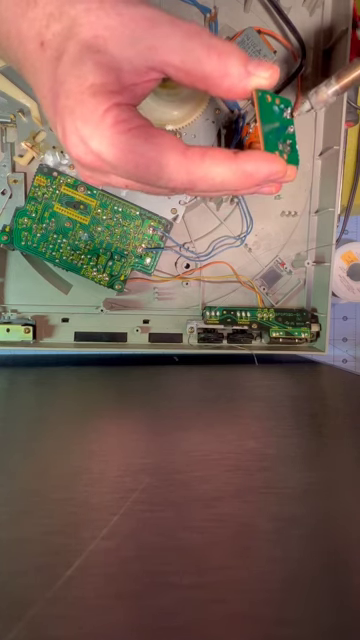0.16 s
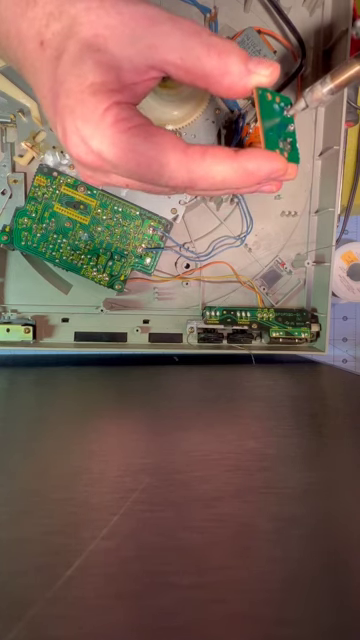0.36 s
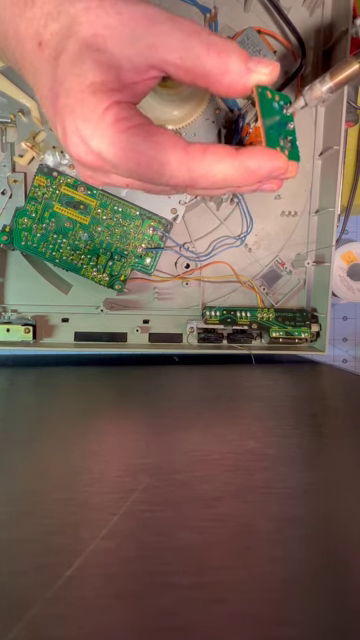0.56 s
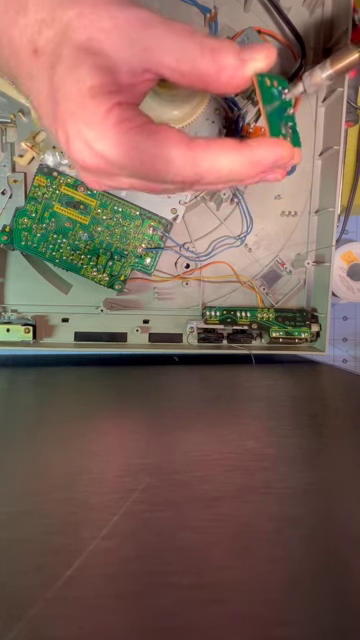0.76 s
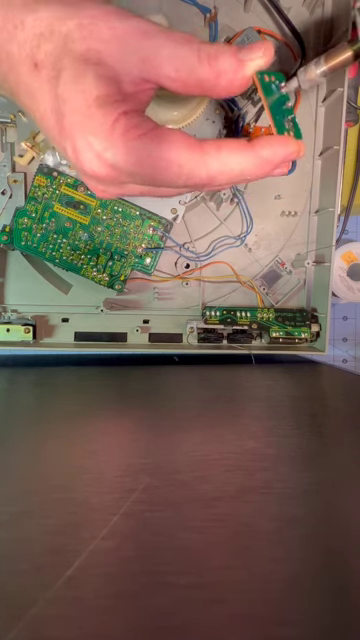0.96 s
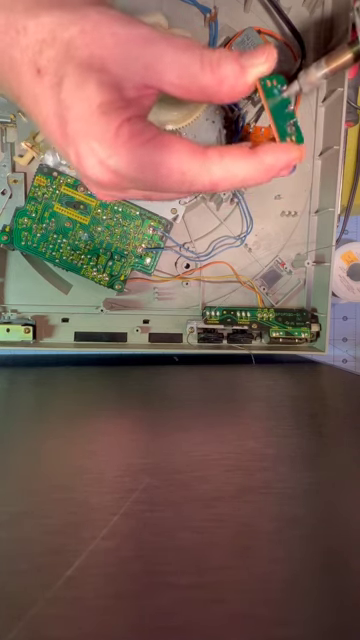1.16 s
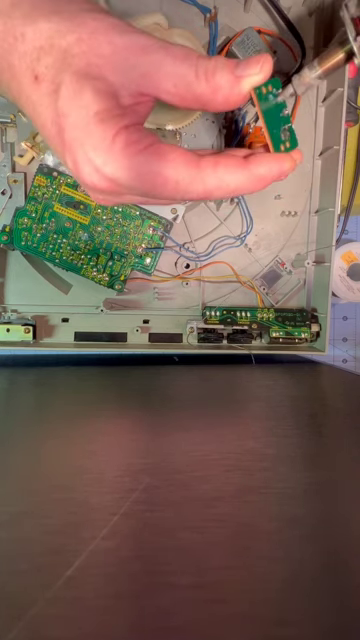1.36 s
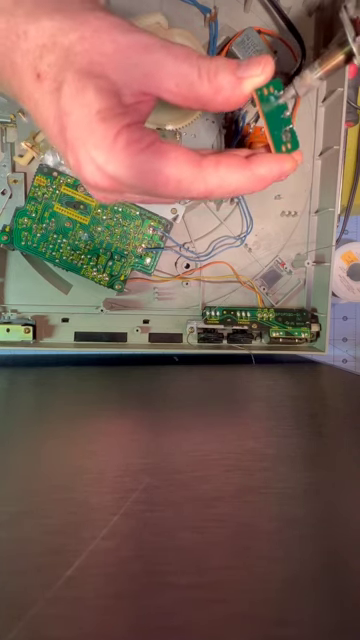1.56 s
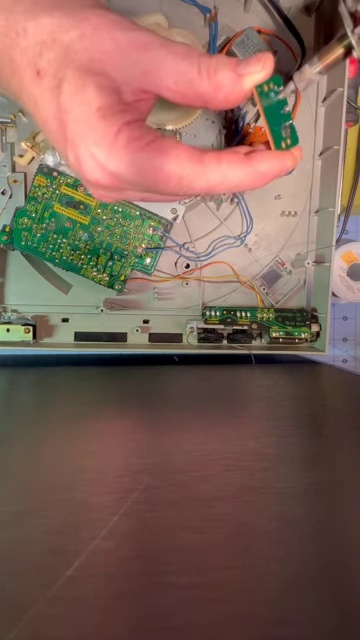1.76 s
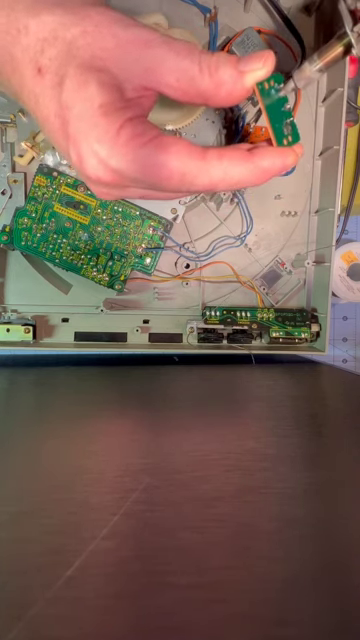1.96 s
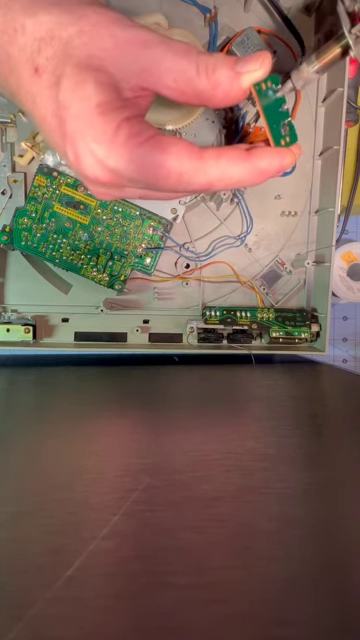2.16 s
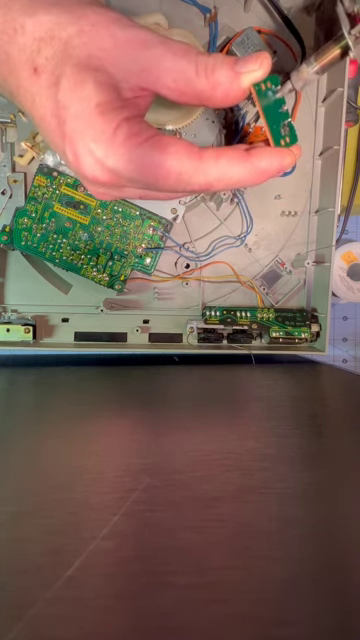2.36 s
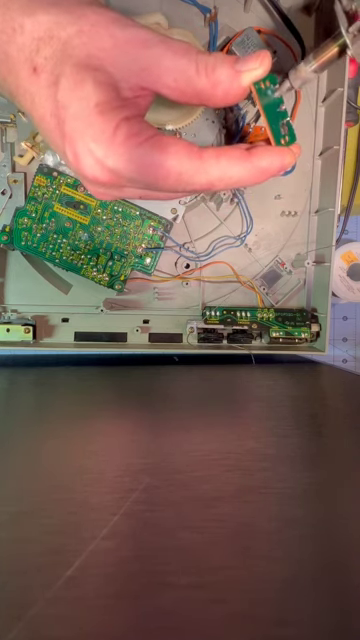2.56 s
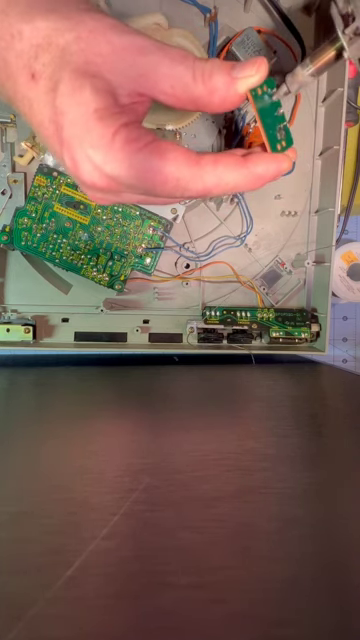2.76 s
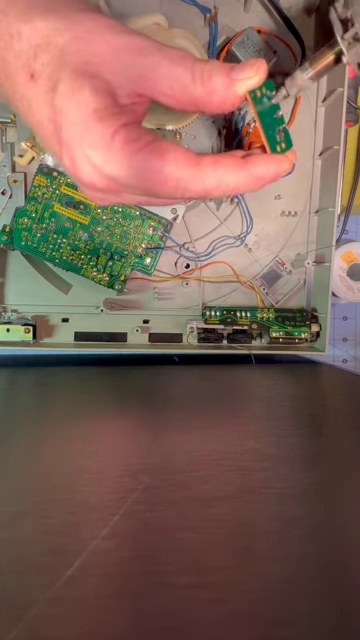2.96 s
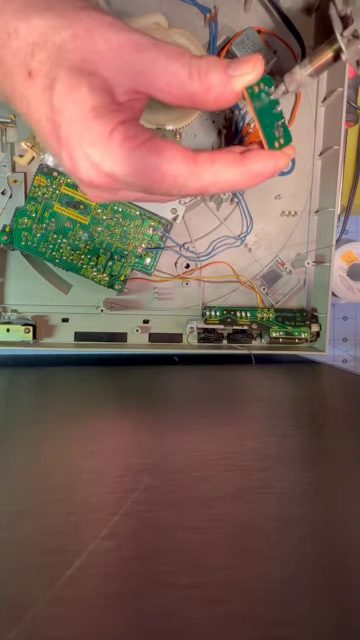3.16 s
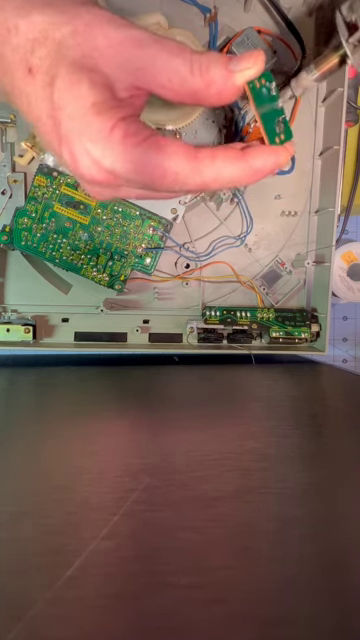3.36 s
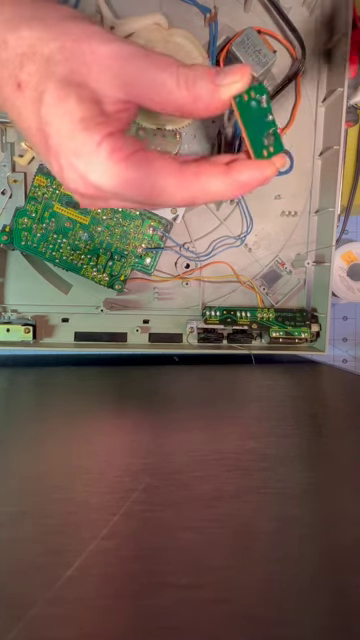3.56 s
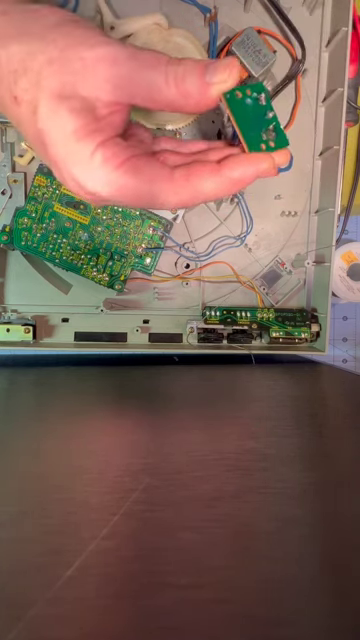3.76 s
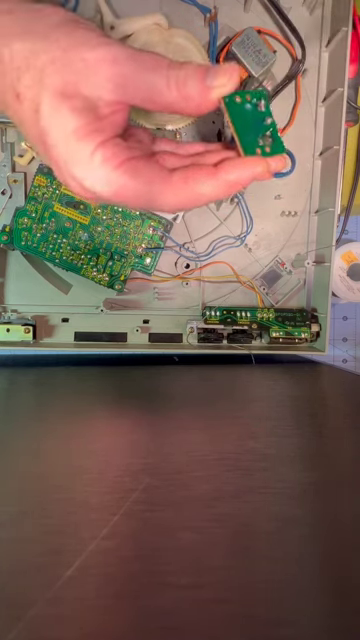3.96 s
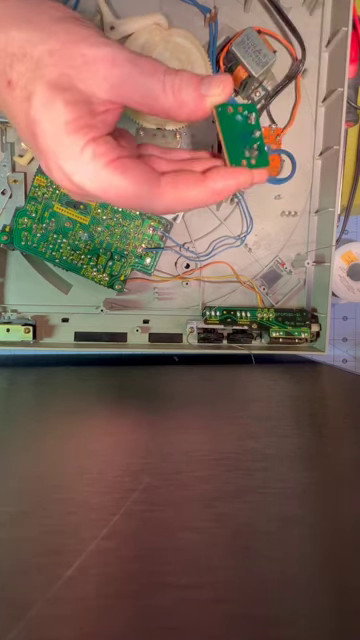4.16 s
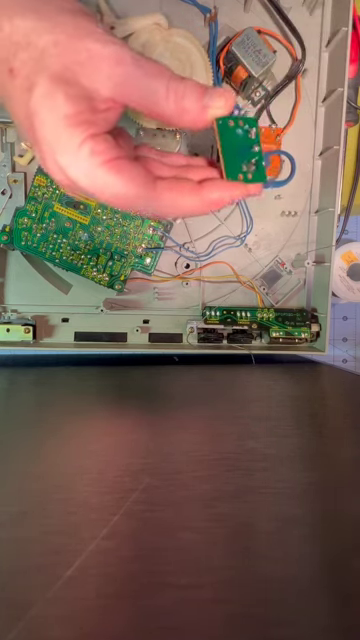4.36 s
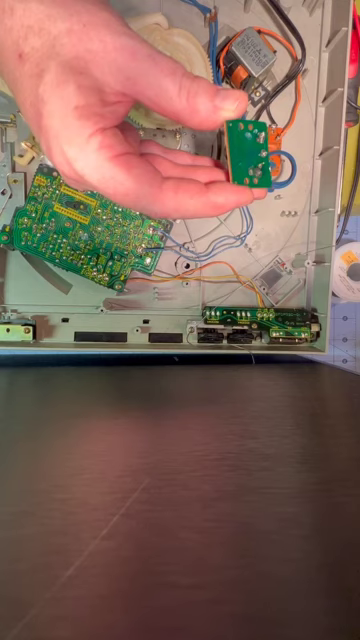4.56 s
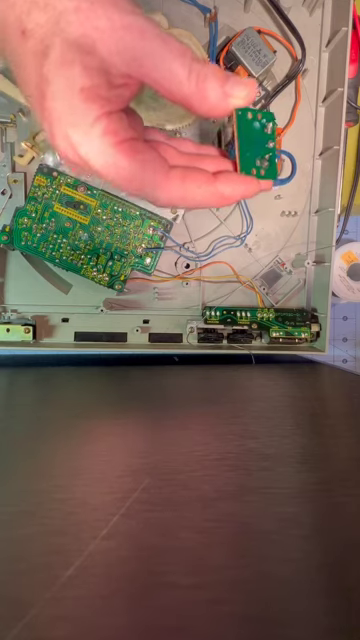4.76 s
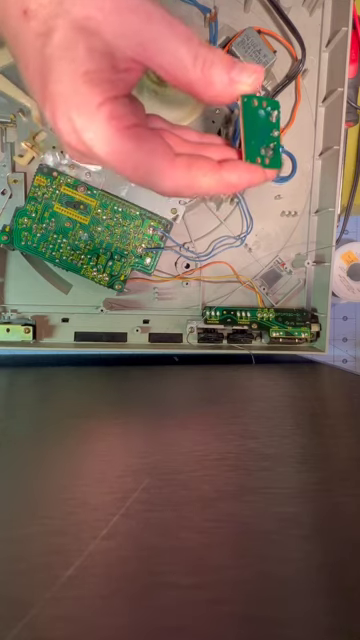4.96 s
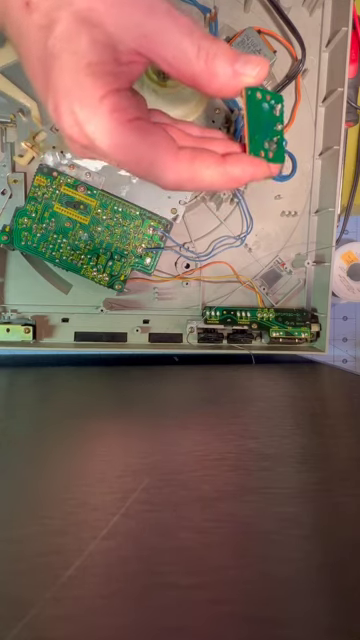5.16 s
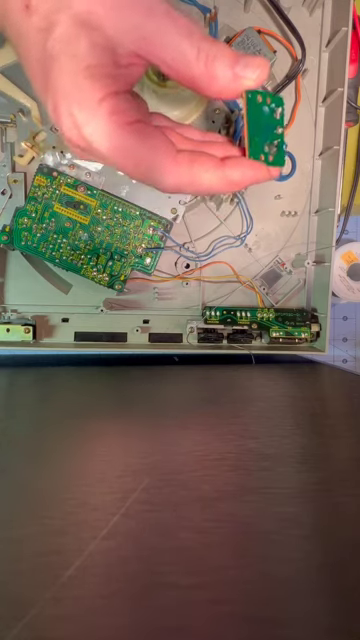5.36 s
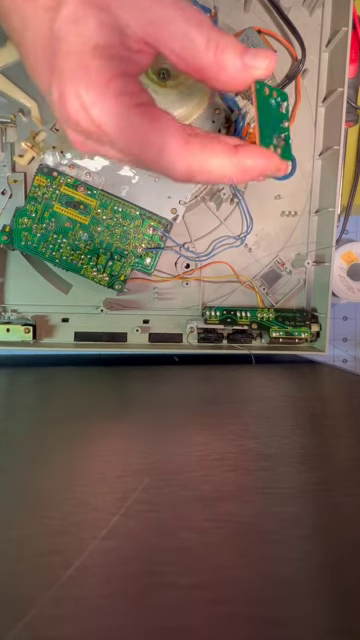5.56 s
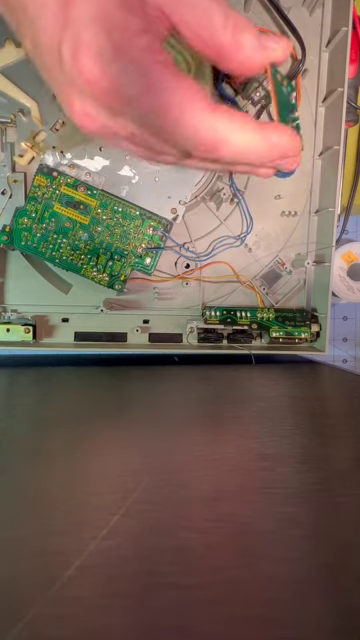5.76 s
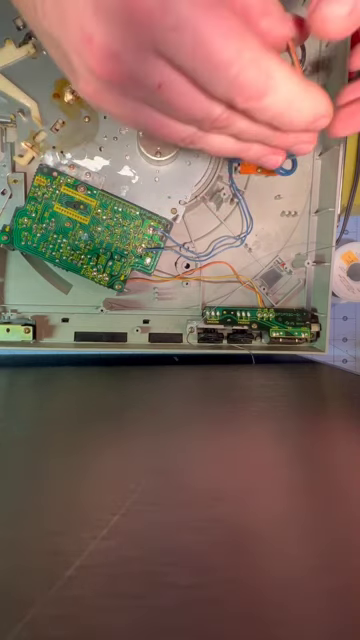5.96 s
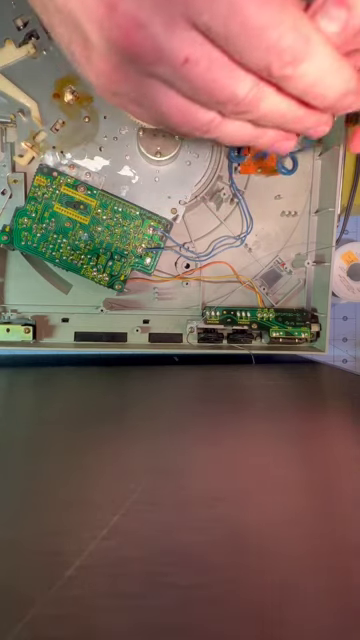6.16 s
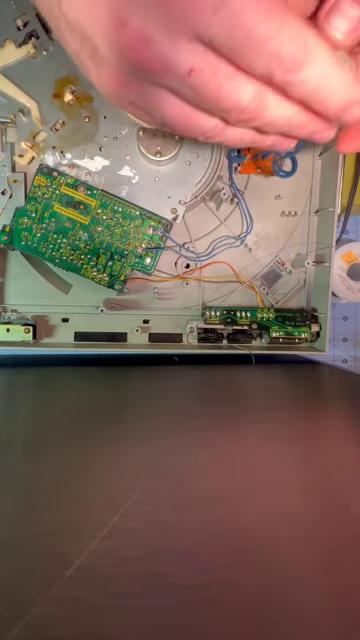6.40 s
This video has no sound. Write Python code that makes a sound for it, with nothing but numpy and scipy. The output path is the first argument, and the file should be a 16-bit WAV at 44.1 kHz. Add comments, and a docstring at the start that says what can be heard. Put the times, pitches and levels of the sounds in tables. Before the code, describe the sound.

Small dry ticks on a circuit board, then a desoldering pump buzzes for about a second, followed by metallic clatter, low thuds and a sharp scrape.

```python
"""A desoldering gun at a workbench, close to the microphone in a small room with faint air noise and hum.
Fingers rub and the hot nozzle ticks on a joint: coloured noise bursts, each with a knock of the board.
The diaphragm pump races, loads up, sucks and coasts: shaft harmonics, valve slaps and hiss; thin whistles follow.
The gun grates and clatters into its metal stand (showers of impacts, ringing modes); bench and chassis boom.
Last, the small circuit board's edge scrapes in stick-slip bursts and the board is put down."""
import sys
import numpy as np
from scipy import signal
from scipy.fft import rfft, irfft
from scipy.io import wavfile

SR = 44100
rng = np.random.default_rng(int(sys.argv[2]) if len(sys.argv) > 2 else 0)


def bounce(signal):
    """Save signal as a 16-bit WAV file at the path given by the first command-line argument."""
    frames = np.transpose(np.atleast_2d(signal))
    limited = np.clip(frames, -1, 1)
    pcm = np.round(limited * 32767).astype(np.int16)
    wavfile.write(sys.argv[1], SR, pcm)


N = 283563
TIME = np.arange(N) / SR
HIT_TIME = TIME[:SR * 6 // 10]

# pump cycle: trigger pressed, nozzle sealed by solder, air flow starts to fail, plug clears, trigger released
ON_S, SEALED_S, STARVED_S, CLEARED_S, OFF_S = 2.403, 2.556, 2.597, 2.89, 3.644
# shaft rate running free and under vacuum
FREE_HZ, LOADED_HZ = 73, 57.85
# length of the gulp of air and solder
GULP_S = 0.042

# brittle snap of a tick: f/Hz, level/dB
SNAP_SPECTRUM = [(2500, -7.5), (5200, -2.5), (6000, 5), (7200, 0), (8000, 0.5), (11000, -7), (13000, -24),
                 (16000, -46)]
# body of a tick: f/Hz, level/dB
BODY_SPECTRUM = [(500, -23), (1200, -4), (2200, 10), (3200, -2), (4800, -11), (7000, -29)]
# rasp of an edge: f/Hz, level/dB
EDGE_SPECTRUM = [(1300, -24), (2250, -11.5), (2620, 8), (3000, -19), (3600, -12), (6000, -50)]
# gritty grating: f/Hz, level/dB
GRIT_SPECTRUM = [(1200, -19), (1900, 3.5), (2250, -1), (2700, 2.5), (3200, 0.5), (3800, -7.5),
                 (4900, -15.5), (8000, -22.5)]
# modes of the bench top: f/Hz, level/dB, t60/s
BENCH_MODES = [(95.4, -1.5, 0.41), (115.2, -3.5, 0.36), (224.2, -2.5, 0.14), (280, -11.5, 0.019)]
# modes of the steel chassis: f/Hz, level/dB, t60/s
CHASSIS_MODES = [(240, -1.5, 0.11), (315, 3, 0.085), (496, -8.5, 0.12), (545.4, 6.5, 0.2),
                 (600, -31, 0.071), (673, -12.5, 0.037), (821, -3.5, 0.044), (1120, -2, 0.053)]
# modes of the gun's metal: f/Hz, level/dB, t60/s
GUN_MODES = [(1612, -7, .25), (2178, -5, .16), (3249, -5, .2), (3483, -11, .22), (3746, 1, .27),
             (4070, -1, .15), (4346, -6, .24), (4665, -13, .2), (4947, -9, .29), (5413, -6, .25),
             (5645, -9, .23), (5778, -5, .3), (5809, -7, .3), (6089, -11, .29), (6217, -5, .24),
             (6896, -14, .25), (7036, -15, .33), (7374, -3, .26), (7765, -8, .2), (7979, -8, .26),
             (8143, -5, .17), (8356, -3, .2), (9496, -13, .2), (9582, -13, .2), (9795, -2, .14),
             (10220, -13, .21), (10553, -8, .14), (10740, -7, .16), (11080, -11, .17)]


def amp(db):
    """Decibels to gain."""
    return 10 ** (np.asarray(db) / 20)


def unit(x):
    """Scale to rms 1."""
    return x / np.sqrt(np.mean(x ** 2))


def colour(x, points, share=1):
    """Filter by a (f/Hz, level/dB) spectrum, its dB scaled by share."""
    hz, db = np.transpose(points)
    f = np.maximum(np.fft.rfftfreq(x.shape[-1], 1 / SR), 1)
    gain = amp(share * np.interp(np.log(f), np.log(hz), db))
    return irfft(rfft(x) * gain, x.shape[-1])


def no_bass(x, hz):
    """Steep high-pass."""
    return signal.sosfilt(signal.butter(4, hz, "high", fs=SR, output="sos"), x)


def noise(points, size=N):
    """A mid and side pair of coloured noises, rms 1."""
    return unit(colour(rng.standard_normal((2, size)), points))


def walk(rate_hz, size=N):
    """A random wander of spread near 1."""
    steps = rng.standard_normal(size // 16)
    return 1.24 * np.interp(TIME[:size] * rate_hz, np.arange(len(steps)), steps)


def since(s):
    """Seconds gone by since a moment, zero before it."""
    return np.maximum(TIME - s, 0)


def gate(start, stop, attack, release):
    """An envelope that swells from its start and dies away after its stop."""
    return (1 - np.exp(-since(start) / attack)) * np.exp(-since(stop) / release)


def burst(points, rise, decay):
    """A contact: coloured noise that swells and dies away."""
    envelope = (1 - np.exp(-HIT_TIME / rise)) * np.exp(-HIT_TIME / decay)
    return noise(points, len(HIT_TIME)) * envelope


def ring(modes, scatter_db=2, rise=0.0007, scatter_turns=1):
    """Damped modes; each blow lands elsewhere and weights them anew."""
    hz, db, t60 = np.transpose(modes)[:, :, None]
    size = amp(db + scatter_db * rng.standard_normal((len(modes), 1)))
    phase = 2 * np.pi * (hz * HIT_TIME + scatter_turns * rng.random((len(modes), 1)))
    # the side hears each mode a quarter cycle after the mid
    phase = phase - np.arange(2)[:, None, None] * np.pi / 2
    decay = np.exp(-np.log(1000) * HIT_TIME / t60)
    y = np.sum(size * np.sin(phase) * decay, axis=1)
    return y * (1 - np.exp(-HIT_TIME / rise)) / np.sqrt(np.sum(size ** 2) / 2)


def resonate(x, response):
    """Drive a body with a force; the response is scaled to unit energy."""
    response = response / np.sqrt(np.sum(response ** 2) / 2)
    return signal.fftconvolve(x, response, axes=1)[:, :x.shape[1]]


def add(out, s, sound):
    """Mix a sound in at a time."""
    start = max(int(s * SR), 0)
    out[:, start:start + sound.shape[1]] += sound[:, :N - start]


def room(x, wet_db, t60):
    """A small, furnished room adds a short tail above the bass."""
    tail_spectrum = [(2000, -0.5), (8000, -5.0), (14000, -17.5)]
    tail = burst(tail_spectrum, rise=0.0015, decay=t60 / np.log(1000))
    return x + amp(wet_db) * resonate(x, no_bass(tail, 149))


def stereo(pair, width):
    """Mid and side to left and right; width is the side's gain over frequency."""
    side = colour(pair[1], width)
    return np.array([pair[0] + side, pair[0] - side])


def room_tone():
    """Faint, slightly wavering air noise and a low hum of sines."""
    # air noise: f/Hz, level/dB
    air_spectrum = [(25, 9), (60, 6.5), (105, 16), (150, -2), (400, -10), (700, -19), (1250, -18),
                    (1780, 2), (2200, -11.5), (2850, -15), (3500, -9.5), (4900, -31.5), (6100, -16.5),
                    (8000, -31.5), (11000, -33), (14000, -48)]
    # hum lines: f/Hz, level/dB
    hum_lines = [(60, -71), (114, -72.5)]
    hum = 0
    for hz, db in hum_lines:
        hum = hum + amp(db) * np.sqrt(2) * np.sin(2 * np.pi * (hz * TIME + rng.random()))
    return amp(-63.5) * noise(air_spectrum) * amp(1.4 * walk(6)) + hum


def rubbing():
    """Grainy strokes of fingers, cable and wires; the bench's lowest modes boom along with them."""
    # strokes: t/s, length/s, dull rub/dB, bright rub/dB, bench boom/dB
    strokes = np.array([(0, 0.041, -55, -60, -58.5), (0.134, 0.25, -67, -79, -65.5),
                        (4.009, 0.19, -67, -80.5, -55.5), (4.222, 0.22, -75, -87.5, -63),
                        (4.472, 0.35, -59.5, -74.5, -80), (4.93, 0.14, -48.5, -54.5, -43.5),
                        (5.144, .32, -61.5, -58, -62), (5.63, 0.031, -51, -70.5, -58),
                        (5.838, 0.15, -63.5, -80.5, -62), (6.011, 0.27, -55.5, -67.5, -57.5)])
    # dull rub: f/Hz, level/dB
    dull_spectrum = [(100, 8.5), (300, 7.5), (550, 5), (750, 1.5), (1000, -4.5), (1250, 2.5), (1450, -1.5),
                     (1700, 1.5), (2700, -5), (3150, -10.5), (3450, -5), (4000, -21), (7000, -43.5)]
    # bright rub: f/Hz, level/dB
    bright_spectrum = [(2500, -14.5), (4400, -1.5), (5100, -7), (5800, 2.5), (6500, -1.5), (7300, -10.5),
                       (10500, -13), (12500, -31.5)]
    envelopes = np.array([gate(s, s + length, attack=0.0057, release=0.06) for s, length, *_ in strokes])
    dull, bright, push = amp(strokes[:, 2:].T) @ envelopes
    boom = resonate(push * rng.standard_normal((2, N)), ring(BENCH_MODES[:2]))
    dull_rub = dull * noise(dull_spectrum) * amp(0.71 * walk(150))
    bright_rub = bright * noise(bright_spectrum) * amp(2 * walk(330))
    return dull_rub + bright_rub + boom


def snap(body_db):
    """A brittle snap with a short body."""
    body = burst(BODY_SPECTRUM, rise=0.00036, decay=0.0016)
    return amp(-4) * burst(SNAP_SPECTRUM, rise=0.00038, decay=0.0019) + amp(body_db) * body


def flex(start_hz=1500, end_hz=520, fall=0.0037, decay=0.003):
    """A bending knock: high bending waves outrun low ones, so the pitch drops."""
    hz = end_hz + (start_hz - end_hz) * np.exp(-HIT_TIME / fall)
    envelope = (1 - np.exp(-HIT_TIME / 0.0022)) * np.exp(-HIT_TIME / decay)
    wave = np.sin(2 * np.pi * np.cumsum(hz) / SR) * envelope
    return np.sqrt(2) * np.array([wave, -wave / 2])


def board_knock():
    """The little board flexes and gives a hollow knock."""
    # hollow knock: f/Hz, level/dB
    knock_spectrum = [(150, -12.5), (450, -4), (750, -5), (1150, -2.5), (1500, -27), (2500, -32)]
    return flex() + amp(-3.5) * burst(knock_spectrum, rise=0.0011, decay=0.0084)


def ticks(lag_s=0.002):
    """Creaks are thin snaps, clicks fuller with a nozzle ring; the board answers both just after."""
    # nozzle creaks as it rocks on the joint: t/s, level/dB
    creaks = [(0.5346, -47.5), (0.5473, -51), (0.5732, -48), (.602, -47.5), (0.6130, -52), (0.6396, -46),
              (.651, -51), (0.6647, -49), (0.68, -45.5), (0.754, -45), (1.1079, -53.5), (1.478, -51.5),
              (1.5291, -55), (1.586, -56.5), (1.86, -55)]
    # creak: f/Hz, level/dB
    creak_spectrum = [(2500, -3), (5000, -13), (6200, 2), (8000, 6.5), (11000, 4), (13000, -24),
                      (16000, -32)]
    # hard clicks of nozzle, trigger and board: t/s, level/dB
    clicks = [(0.0332, -41.5), (.1394, -44.5), (0.6924, -35.5), (0.764, -33), (1.924, -47), (1.97, -50),
              (2.39, -54.5), (2.4036, -28.5), (5.866, -43.5)]
    # nozzle after a click: f/Hz, level/dB, t60/s
    tip_modes = [(1766, -16.5, 0.045), (2540, 1, 0.035), (3203, -7.5, 0.1), (4420, -8, 0.047),
                 (6400, -2.5, 0.057), (7940, -1.5, 0.049)]
    # nozzle lifts off the joint with a dry crack: t/s, level/dB
    lifts = [(3.168, -37), (3.177, -32.5)]
    # fingers and nozzle knock the board: t/s, level/dB
    board_knocks = [(0.848, -58), (1.092, -52), (1.131, -54.5), (1.649, -59.5), (1.738, -53),
                    (5.841, -38.5), (5.866, -43)]
    out = np.zeros((2, N))
    for s, db in creaks:
        add(out, s, amp(db) * burst(creak_spectrum, rise=0.0001, decay=0.0014))
        # the board springs back at one level, however loud the creak
        add(out, s + lag_s, amp(-51.5) * board_knock())
    for s, db in clicks:
        add(out, s, amp(db) * (snap(body_db=-4) + amp(-13) * ring(tip_modes, scatter_db=1.5)))
        add(out, s + lag_s, amp(db - 13.5) * board_knock())
    for s, db in lifts:
        crack = burst(EDGE_SPECTRUM, rise=0.00045, decay=0.0024)
        add(out, s, amp(db) * (crack + amp(2) * snap(body_db=5)))
    for s, db in board_knocks:
        add(out, s, amp(db) * board_knock())
    return out


def shaft_speed():
    """The motor spins up, stumbles as the nozzle seals, labours under vacuum, coasts after release."""
    spin_up_s, load_s, coast_s = .058, .045, .9
    plug_sag_hz, stumble_hz = .85, 9
    free = FREE_HZ * (1 - np.exp(-since(ON_S) / spin_up_s))
    loaded = LOADED_HZ - plug_sag_hz * np.exp(-since(CLEARED_S) / load_s)
    vacuum = 1 - np.exp(-since(SEALED_S) / load_s)
    stumble = stumble_hz * gate(SEALED_S, SEALED_S + GULP_S, attack=.012, release=.025)
    return (free + vacuum * (loaded - free) - stumble) * np.exp(-since(OFF_S) / coast_s)


def effort(speed):
    """Gains of shaking, puffing, valves and hiss: puffs need speed and free air, shaking needs vacuum."""
    vent_s = 0.2  # vacuum leaks away after release
    gulp = gate(SEALED_S - GULP_S / 2, SEALED_S + GULP_S / 2, attack=0.007, release=0.034)
    choke = 1 - .8 * gate(SEALED_S, SEALED_S + GULP_S / 2, attack=.002, release=.004)
    pace = np.minimum(speed / LOADED_HZ, 1)
    shake = amp(-30.5) * gate(SEALED_S, OFF_S, attack=0.047, release=0.038)
    puff = amp(-18) * pace ** 3 * choke * np.exp(-since(STARVED_S) / 0.04)
    valve = amp(-41.5) * gate(ON_S, OFF_S, attack=0.044, release=0.018) + amp(-48.0) * gulp
    leak = np.maximum(1 - since(OFF_S) / vent_s, 0) ** 1.25
    hiss = amp(-51.5) * pace * leak + amp(-39) * gulp
    return shake, puff, valve, hiss


def harmonics(turns, orders):
    """Lines locked to the shaft, as mid and side a quarter cycle apart."""
    z = 0
    for k, db in orders:
        z = z + amp(db) * np.exp(2j * np.pi * (round(k) * turns + rng.random()))
    return unit(np.array([z.real, z.imag]))


def pipe(turns):
    """Two puffs a turn ring the open hose and nozzle."""
    # open hose and nozzle: f/Hz, level/dB, t60/s
    pipe_modes = [(560, 0, 0.18), (764, -4.5, 0.048), (1295, 4.5, 0.027), (2340, -5, 0.045),
                  (2650, -18, 0.028)]
    puffs = np.diff(np.floor(2 * turns), prepend=0) * amp(2 * walk(90))
    return resonate(puffs[None], ring(pipe_modes, scatter_db=-8)) * np.sqrt(SR / (2 * FREE_HZ))


def valves(turns):
    """Valves and crank slap the casing at different spots, never quite evenly, with a loose rattle."""
    # pump casing: f/Hz, width/Hz, level/dB
    casing_table = [(865, 80, -4), (1040, 70, -6), (1310, 100, 0), (1680, 100, 2), (1850, 100, 0),
                    (1970, 100, -2), (2190, 120, 1), (2430, 140, -1), (2700, 130, -3), (3420, 340, -16)]
    # slaps in each turn: phase/turn, level/dB
    slap_table = [(0, 6), (0.211, 1.5), (.38, -0.5), (.83, -11)]
    jitter_turns, scatter_db = .002, 1.5
    modes = [(hz, db, np.log(1000) / np.pi / width) for hz, width, db in casing_table]
    casing = 0
    for at, db in slap_table:
        passed = np.floor(turns - at + jitter_turns * walk(60))
        strength = amp(db + scatter_db * walk(60) + 0.65 * walk(6.1))
        slaps = np.diff(passed, prepend=passed[0]) * strength
        contact = unit(burst(BODY_SPECTRUM, rise=0.00019, decay=0.00042))
        spot = unit(ring(modes, scatter_db=1, rise=0.00099)) + amp(-9.5) * contact
        casing = casing + resonate(slaps[None], spot)
    rattle = noise(BODY_SPECTRUM) * np.exp(-(turns % 1) / 0.64)
    return no_bass(unit(casing) + amp(-8) * unit(rattle), 870)


def hose(turns):
    """While solder plugs the nozzle, strokes ring the closed hose; the honk fades once it clears."""
    # plugged hose: f/Hz, level/dB, t60/s
    hose_modes = [(905, 9, 0.025), (782, -10.5, 0.029), (1352, -5.5, 0.037)]
    strokes = np.diff(np.floor(turns), prepend=0) * amp(1.5 * walk(60))
    honk = unit(resonate(strokes[None], ring(hose_modes, scatter_db=-6.0)) * (TIME < OFF_S))
    # rms over the trigger time alone, not the whole length
    honk = honk * np.sqrt((OFF_S - ON_S) / TIME[-1])
    return amp(-45.5) * gate(SEALED_S, CLEARED_S, attack=0.11, release=0.04) * honk


def pump():
    """The diaphragm puffs hard while it runs free, then settles to a loaded buzz under suction hiss."""
    # loaded shaking: order/shaft rate, level/dB
    shake_orders = [(1, 0), (2, -1), (3, -17), (4, -9), (5, -11), (6, -18), (7, -31), (8, -16), (9, -20),
                    (10, -29), (11, -36), (12, -28), (13, -32), (14, -22), (15, -22), (16, -23), (17, -25),
                    (18, -21)]
    # free puffing, two puffs a turn: order/shaft rate, level/dB
    puff_orders = [(2, -1), (3, -19.5), (4, -10), (5, -26), (6, -18), (8, -26.5), (10, -31), (12, -25),
                   (14, -41), (18, -37), (20, -39), (22, -49)]
    # whine of the loaded motor: order/shaft rate, level/dB
    whine_orders = [(15, -2), (23, 0), (28, -1), (29, 2), (32, 1), (37, -1), (38, 0), (45, -4), (47, -5)]
    # suction hiss: f/Hz, level/dB
    hiss_spectrum = [(1650, -12.5), (2800, -9.5), (3080, -3.5), (3870, -2), (4060, -7.5), (4860, -8.5),
                     (5170, -11.5), (5640, -1), (6500, -1.5), (7640, 0), (9730, 0.5), (10900, -8.5),
                     (12400, -23), (14000, -51)]
    # churning of air in the pump: f/Hz, level/dB
    churn_spectrum = [(50, -6.5), (110, 7.5), (300, -2.5), (450, 0), (555, 0), (650, -14), (830, 4.5),
                      (1100, -8), (1330, 5), (1520, -9), (2100, -10.5), (2700, -11.5), (3400, -16),
                      (6000, -45)]
    speed = shaft_speed()
    shake, puff, valve, hiss = effort(speed)
    turns = np.cumsum(speed * (1 + .001 * walk(25))) / SR
    whine = amp(2 * walk(20)) * harmonics(turns, whine_orders)
    loaded = harmonics(turns, shake_orders) + amp(-19) * whine
    free = amp(1.5 * walk(70)) * harmonics(turns, puff_orders) + amp(-18.5) * pipe(turns)
    buzz = shake * loaded + puff * free
    churn = noise(churn_spectrum) * (amp(-4.5) * valve + amp(-16) * puff)
    pulse = 1 + .15 * np.cos(2 * np.pi * turns)
    suction = noise(hiss_spectrum) * hiss * amp(1.5 * walk(60)) * pulse
    out = buzz + amp(-6.0) * valve * valves(turns) + churn + suction + hose(turns)
    # the coasting pump rocks on its feet
    rock = gate(OFF_S, OFF_S, attack=0.032, release=0.12) * amp(2.5 * walk(35))
    out = out + amp(-37) * rock * harmonics(turns, shake_orders[:1])
    # the motor jerks into motion, and jolts as it is cut
    add(out, ON_S + 0.024, amp(-33.5) * burst(churn_spectrum, rise=0.0014, decay=0.023))
    add(out, OFF_S, amp(-39) * burst(churn_spectrum, rise=0.0058, decay=0.023))
    return out


def nozzle():
    """Solder seals the nozzle with a gritty burst, rings the gun's metal, then spits up in drops."""
    # solder drops: t/s, level/dB
    spits = [(2.7043, -35), (2.8712, -26), (3.07, -37.5), (3.113, -38), (3.153, -32.5), (3.68, -43)]
    # how strongly solder excites the gun's ringing: f/Hz, level/dB
    drive_spectrum = [(2000, 0), (3700, 2), (5000, 8.5), (5800, 6), (7400, -15), (9000, -20)]
    out = np.zeros((2, N))
    grit = burst(GRIT_SPECTRUM, rise=0.0104, decay=0.035) * amp(2.2 * walk(400, len(HIT_TIME)))
    add(out, SEALED_S - .012, amp(-34.5) * grit)
    gun = colour(ring(GUN_MODES, rise=0.023), drive_spectrum) * np.exp(-HIT_TIME / 0.17)
    add(out, SEALED_S, amp(-28.5) * gun)
    for s, db in spits:
        add(out, s, amp(db) * burst(SNAP_SPECTRUM, rise=.0002, decay=.003))
    return out


def blow(bench_db, chassis_db):
    """One soft blow sets both the bench top and the chassis ringing."""
    bench = ring(BENCH_MODES, scatter_db=2.5, rise=0.005, scatter_turns=0.16)
    chassis = ring(CHASSIS_MODES, scatter_db=4.0, rise=0.0014, scatter_turns=0.33)
    return amp(bench_db) * bench + amp(chassis_db) * chassis


def bumps(boom_lag_s=0.01084):
    """Weight bends the bench in a falling thud, then a low boom; knocks on the chassis rebound."""
    # knocks on the open chassis: t/s, level/dB
    chassis_knocks = [(2.553, -26), (2.66, -34.5), (3.648, -39.5), (5.216, -46.5), (5.637, -42.5),
                      (5.653, -36), (6.004, -44), (6.178, -36), (6.212, -45)]
    # weight lands on the bench: t/s, level/dB
    thumps = [(4.679, -27), (4.748, -26), (4.978, -33), (5.02, -38.5), (5.098, -44.5), (5.176, -50.5),
              (6.004, -60), (6.178, -50.5)]
    # dull thud: f/Hz, level/dB
    thud_spectrum = [(80, -11.5), (150, -1), (240, 2.5), (400, -12), (800, -12.5), (1500, -52)]
    rebound_s, rebound_db, count = .024, -9.5, 4
    out = np.zeros((2, N))
    for s, db in chassis_knocks:
        for k in range(count):
            late_s = k * rebound_s * (1 + .1 * rng.standard_normal())
            add(out, s + late_s, amp(db + k * rebound_db) * blow(bench_db=-20, chassis_db=0))
    for s, db in thumps:
        bend = flex(start_hz=609.5, end_hz=118.6, fall=0.01007, decay=0.042)
        steel = ring(CHASSIS_MODES, scatter_db=-1.0, rise=0.0018)
        add(out, s, amp(db) * (amp(-10.5) * bend + amp(-14.5) * steel))
        add(out, s, amp(db - 7) * burst(thud_spectrum, rise=0.0014, decay=0.048))
        add(out, s + boom_lag_s, amp(db) * blow(bench_db=3.0, chassis_db=-13.5))
    return out


def whistle(width_hz=170):
    """A narrow, airy whistle, noise on a sine, that slides down and later creeps up again."""
    # whistles: start/s, loudest/s, end/s, start f/Hz, end f/Hz, peak level/dB
    whistles = [(3.726, 3.75, 3.804, 6600, 5430, -59.5), (4.115, 4.376, 4.47, 5200, 6180, -69.5)]
    flutter = noise([(width_hz, 0), (3 * width_hz, -20), (8 * width_hz, -50)])
    out = 0
    for start, loudest, end, start_hz, end_hz, db in whistles:
        hz = np.interp(TIME, [start, end], [start_hz, end_hz])
        swell = np.interp(TIME, [start, loudest, end], [0, 1, 0])
        out = out + amp(db) * swell * np.sqrt(2) * np.sin(2 * np.pi * np.cumsum(hz) / SR)
    return flutter * out


def grating():
    """The barrel drags along its holder in a gritty stream of tiny catches."""
    # slides: t/s, length/s, level/dB
    slides = [(4.467, 0.22, -61.5), (4.67, 0.068, -39.5), (4.933, 0.061, -45), (5.106, 0.15, -65)]
    pressure = 0
    for s, length, db in slides:
        pressure = pressure + amp(db) * gate(s, s + length, attack=0.025, release=0.038)
    return pressure * unit(noise(GRIT_SPECTRUM) * amp(4 * walk(900)))


def stand():
    """The gun chatters against its holder in showers of tiny impacts; both ring on."""
    # contacts: t/s, bright level before the mix/dB, decay/s, dull re bright/dB, gun ring re bright/dB
    contacts = [(4.48, -51.5, 0.00065, 18, -22), (4.496, -57.5, 0.0029, 15, 0),
                (4.677, -21, 0.0036, -23, -18), (4.685, -29.5, 0.034, -4.5, -9),
                (4.713, -30, 0.0022, -18, -2), (4.728, -29, 0.0029, 6.5, -8),
                (4.731, -14, 0.012, -24, -2.5), (4.750, -28, 0.026, 4, 7), (4.977, -37, 0.0087, -8, -5),
                (5.014, -35.5, 0.0072, -18, -17), (5.096, -37.5, 0.015, 4, -14),
                (5.111, -34, 0.0075, 1, -4), (5.136, -30, 0.0078, -1, -12), (5.156, -38.5, 0.013, 6, -10),
                (5.457, -67, 0.0096, 15.5, -8)]
    # bright clatter: f/Hz, level/dB
    crash_spectrum = [(240, -39.5), (400, -9.5), (804, -10.5), (994, -19), (1590, 4), (2510, -16),
                      (3660, -9), (4600, -22.5), (5600, 4), (6510, -3.5), (8060, 1), (8960, -6.5),
                      (11100, -1.5), (12300, -17.5), (15000, -40)]
    # dull clatter: f/Hz, level/dB
    clunk_spectrum = [(600, -23), (1400, -25), (1700, 14), (2100, 2), (2600, -2), (3500, 2), (4500, 0),
                      (7000, -44.5)]
    # holder pings, pitch set by the spot touched: t/s, f/Hz, level/dB
    pings = [(5.097, 6220, -44), (5.110, 6230, -35.5), (5.110, 2036, -39), (5.111, 8400, -51),
             (5.111, 4520, -43), (5.137, 7900, -36.5), (5.457, 3470, -50)]
    # barrel sliding home: f/Hz, level/dB, t60/s
    barrel_modes = [(1626, -3, .25), (4371, 0, .3), (4953, -6, .2), (6040, -17, .4)]
    holder_damp_s, ping_t60_s, seated_s = .09, 0.076, 5.146
    chatter, out = np.zeros((2, 2, N))
    for s, db, decay, dull_db, ring_db in contacts:
        rise = 0.053 * decay
        shower = burst(crash_spectrum, rise, decay) + amp(dull_db) * burst(clunk_spectrum, rise, decay)
        add(chatter, s, amp(db) * shower * amp(3.5 * walk(500, len(HIT_TIME))))
        gun = ring(GUN_MODES, scatter_db=0.5, rise=0.013) * np.exp(-HIT_TIME / holder_damp_s)
        add(out, s, amp(db + ring_db) * gun)
    for s, hz, db in pings:
        add(out, s, amp(db) * ring([(hz, 0, ping_t60_s)], scatter_db=0, rise=.0015))
    add(out, seated_s, amp(-38.0) * ring(barrel_modes, rise=0.011))
    # countless short modes of the sheet metal, as decaying noise, colour every impact alike
    sheet_decay = np.exp(-HIT_TIME / 0.007) + amp(-21) * np.exp(-HIT_TIME / 0.052)
    sheet = rng.standard_normal((2, len(HIT_TIME))) * sheet_decay
    return out + amp(-5.0) * chatter + amp(-8.0) * resonate(chatter, sheet)


def scrape(count=11):
    """The board's edge sticks and slips ever faster and harder, rasps, and comes free with a low knock."""
    # one slip: f/Hz, level/dB
    slip_spectrum = [(500, -17.5), (1240, -16), (2020, -39), (2700, -15), (3720, -24), (4250, -8.5),
                     (4900, -13), (5300, -0.5), (6700, -0.5), (7700, -10), (8800, 0.5), (10000, -12),
                     (11200, -22), (12000, -48), (14000, -70.5)]
    # flicked edge: f/Hz, level/dB, t60/s
    flick_modes = [(2640, 0, .05), (2950, -6, .035)]
    start_s, length_s = 5.7205, .0218
    first_db, last_db = -31, -22
    rasp_db, rasp_growth_db = -31, 26  # rasp on the last slip, growth up to it
    out = np.zeros((2, N))
    for along in np.linspace(0, 1, count):
        s = start_s + length_s * along ** .8 + .0002 * rng.standard_normal()
        db = first_db + along * (last_db - first_db)
        slip = amp(2.5) * burst(slip_spectrum, rise=0.00013, decay=0.0018)
        slip = slip + amp(-20.5) * burst(SNAP_SPECTRUM, rise=.003, decay=0.019)
        add(out, s, amp(db) * slip)
        rasp = burst(EDGE_SPECTRUM, rise=0.0005, decay=0.0011)
        add(out, s, amp(rasp_db - rasp_growth_db * (1 - along)) * rasp)
    add(out, start_s + length_s * .7, amp(-25) * ring(flick_modes, scatter_db=1.5, rise=.003))
    freed = flex(start_hz=830, end_hz=685, fall=0.0015, decay=0.003)
    add(out, start_s + length_s + .006, amp(-25) * freed)
    return out


def put_down():
    """Thin, wavering ringing as the parts rub together when the board is put down."""
    # rubbing parts: f/Hz, level/dB
    thin_spectrum = [(1100, -7.5), (1250, 7), (1400, -16.5), (3150, -9.5), (3450, 0.5), (3750, -30.5),
                     (4700, -7), (4850, -20), (5000, -24), (5900, -17), (6200, -8), (6800, -57)]
    out = np.zeros((2, N))
    thin = burst(thin_spectrum, rise=0.0027, decay=1.0) * amp(2 * walk(26.7, len(HIT_TIME)))
    add(out, 5.866, amp(-59.0) * thin)
    return out


def scene():
    """The pump leans to one side by frequency; everything else happens in front of the microphone."""
    # side gain of the room tone: f/Hz, gain/dB
    air_width = [(60, -22), (110, -13), (200, 0), (380, 5), (700, 14.5), (1290, -7), (2380, -17.5),
                 (4400, -5.5), (8120, -12), (15000, 9)]
    # side gain of the things in hand: f/Hz, gain/dB
    hand_width = [(60, -18.5), (110, -18.5), (200, -12), (380, -10), (700, 3), (1290, -7), (2380, -6),
                  (4400, -1), (8120, -10), (15000, 18.5)]
    # side gain of the pump: f/Hz, gain/dB
    pump_width = [(60, -46), (110, -28.5), (200, -19.5), (380, -16.5), (700, 6.5), (1290, -5), (2380, -5.5),
                  (4400, -0.5), (8120, -13.5), (15000, 29)]
    # tilt of the things in hand, before the left and right shares: f/Hz, tilt/dB
    hand_lean = [(60, 1), (110, -0.5), (200, 0.5), (380, 1), (700, -1), (1290, 0.0), (2380, 0.0),
                 (4400, 0.0), (8120, 1), (15000, 0.5)]
    # tilt of the pump, before the left and right shares: f/Hz, tilt/dB
    pump_lean = [(120, 0), (200, -1.5), (380, -.5), (650, -5.5), (1290, 3.5), (2380, 3), (4400, 1.5),
                 (9000, .5)]
    near = rubbing() + ticks() + bumps() + whistle() + grating() + stand() + scrape() + put_down()
    left, right = stereo(room(near, wet_db=-15.0, t60=0.32), hand_width)
    hands = np.array([colour(left, hand_lean, 0.55), colour(right, hand_lean, -0.4)])
    left, right = stereo(room(pump() + nozzle(), wet_db=-19.0, t60=0.37), pump_width)
    motor = np.array([colour(left, pump_lean, 0.63), colour(right, pump_lean, -0.154)])
    return motor + hands + stereo(room_tone(), air_width)


def record(dry):
    """Deep bass rolls off; the top treble is softened, with little above 16 kHz."""
    response = [(20, -18), (35, -8), (50, 0), (11500, 0), (12700, -6), (16000, -4)]
    low_pass = signal.ellip(8, .2, 70, 16200, fs=SR, output="sos")
    return signal.sosfilt(low_pass, colour(dry, response))


dry = scene()
out = record(dry)
bounce(out)
```